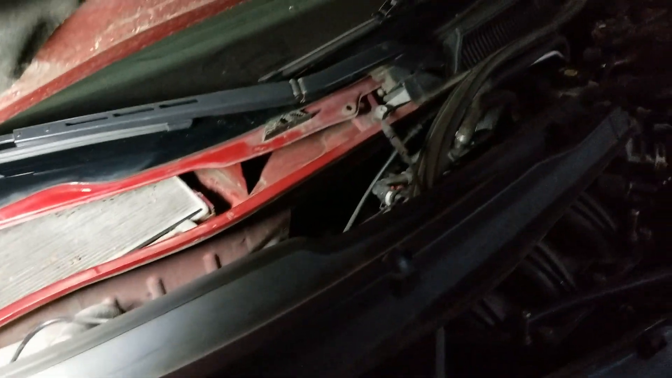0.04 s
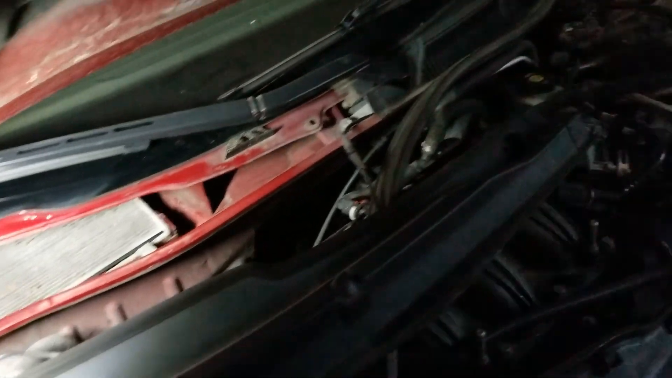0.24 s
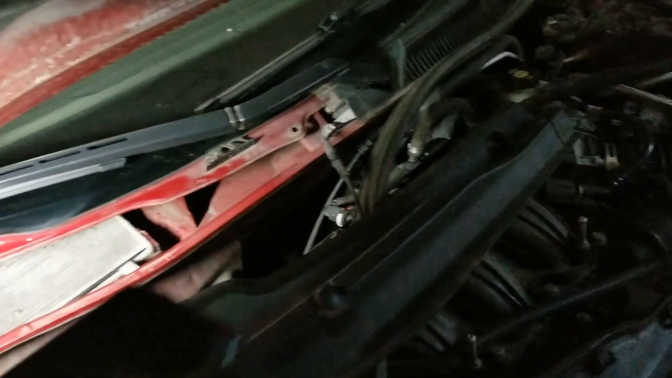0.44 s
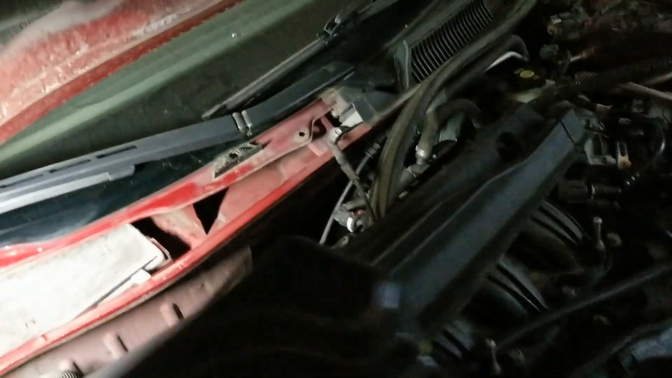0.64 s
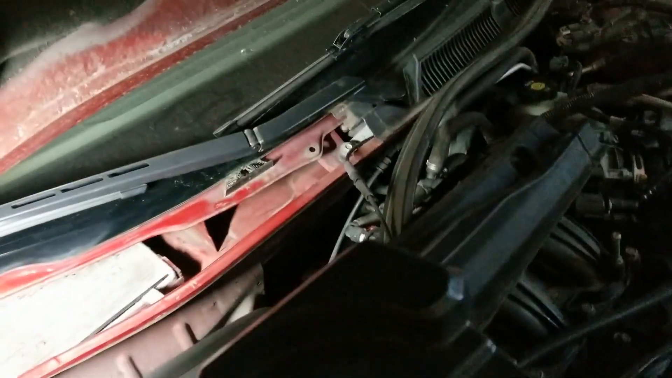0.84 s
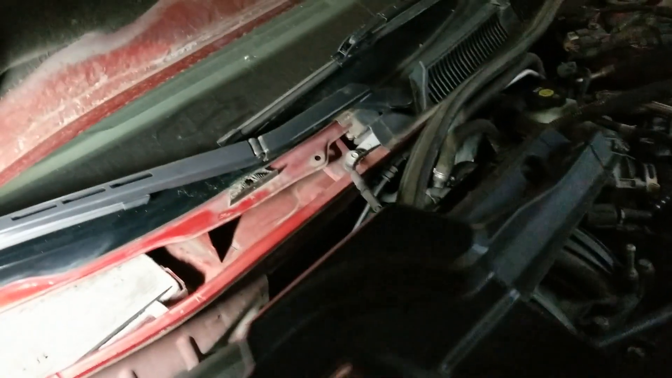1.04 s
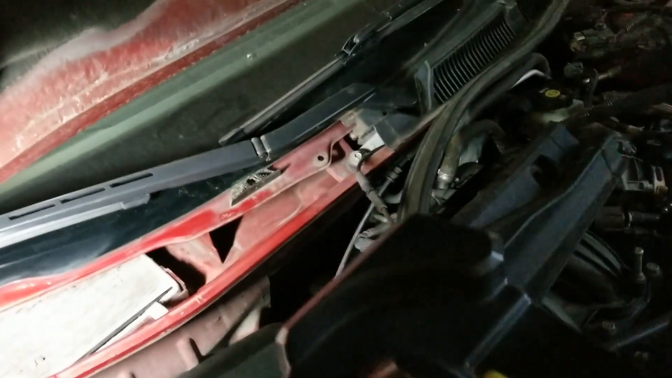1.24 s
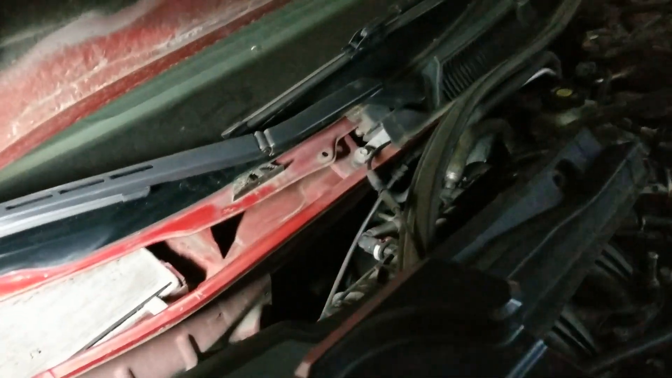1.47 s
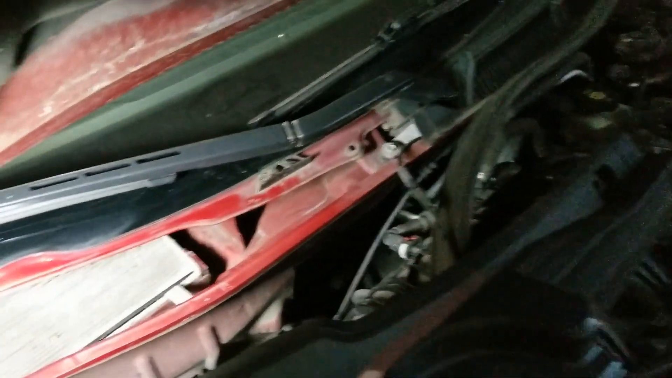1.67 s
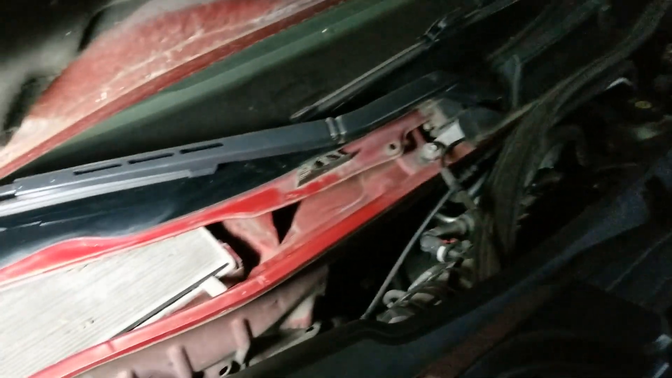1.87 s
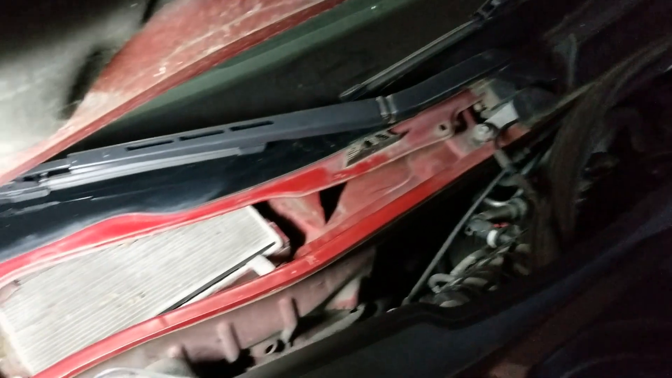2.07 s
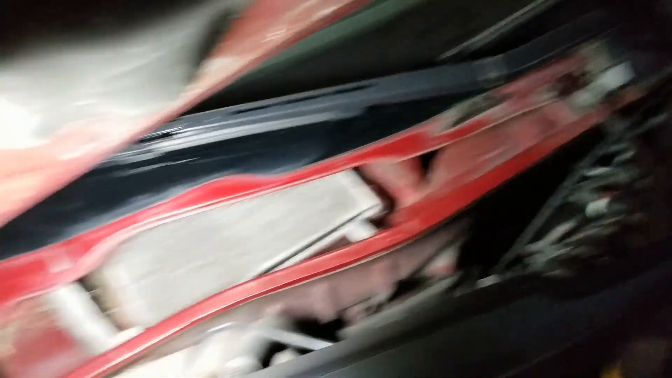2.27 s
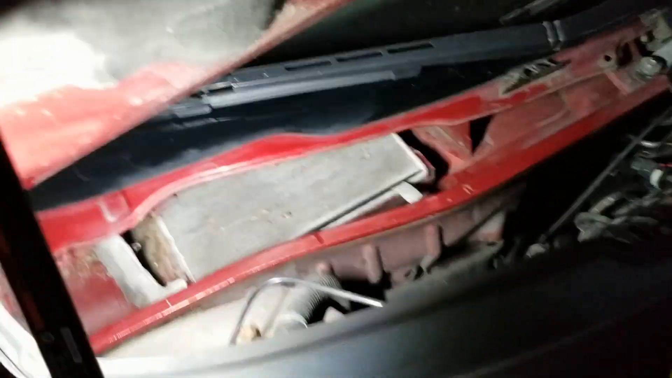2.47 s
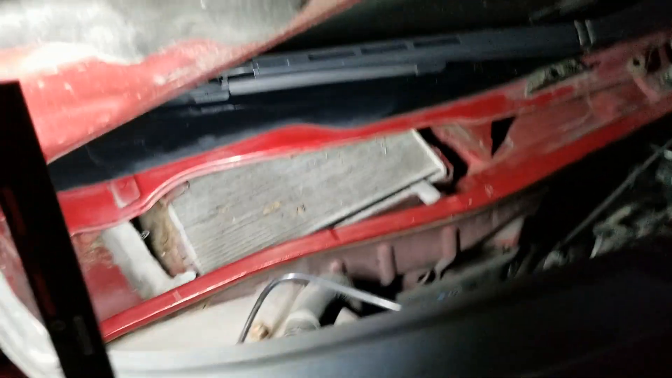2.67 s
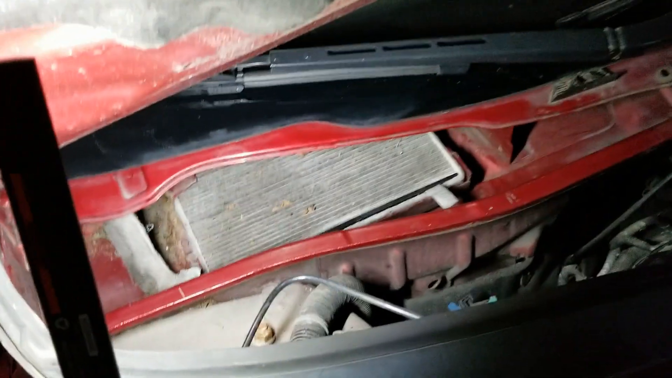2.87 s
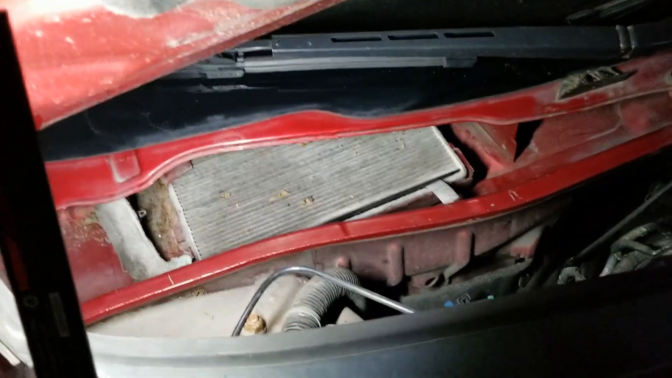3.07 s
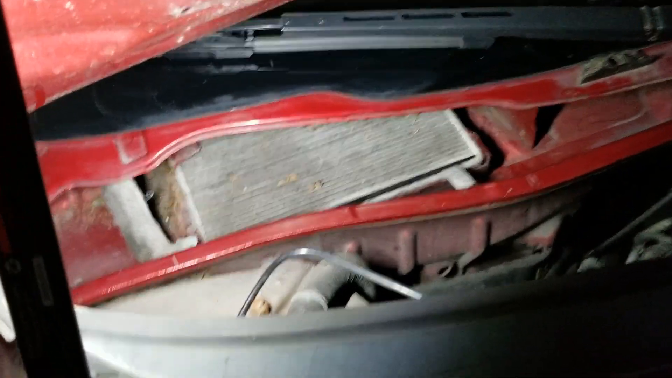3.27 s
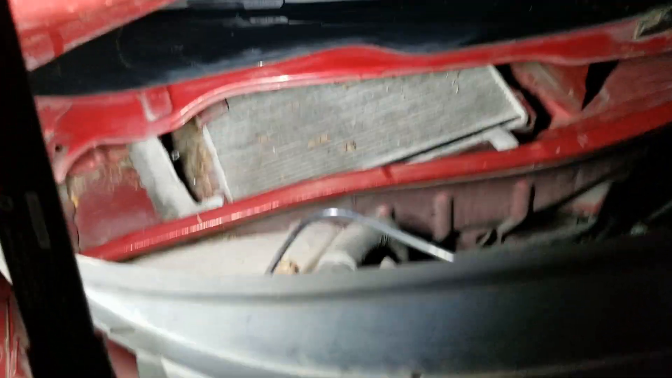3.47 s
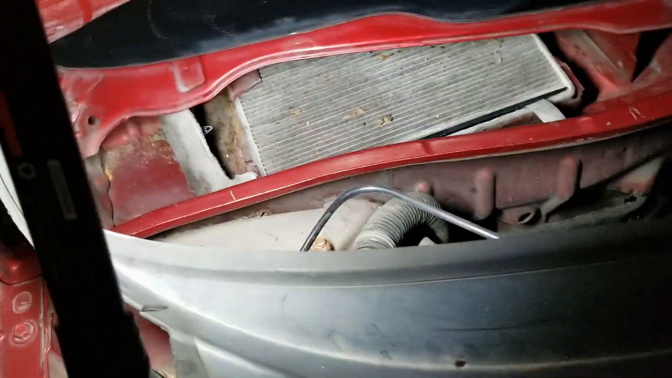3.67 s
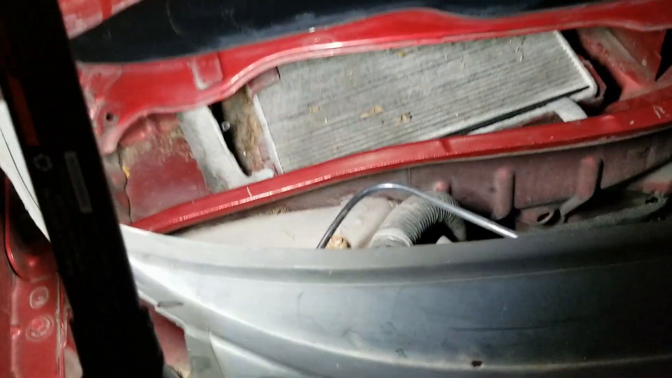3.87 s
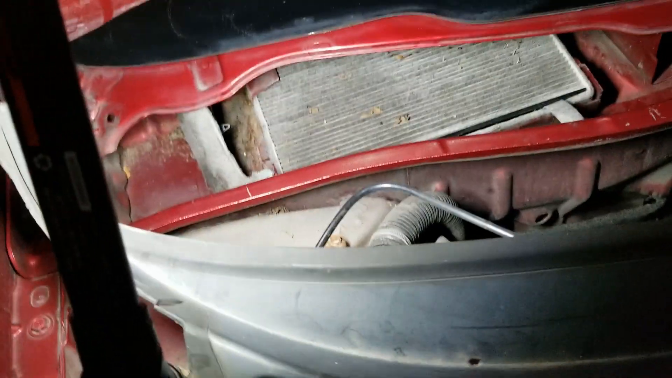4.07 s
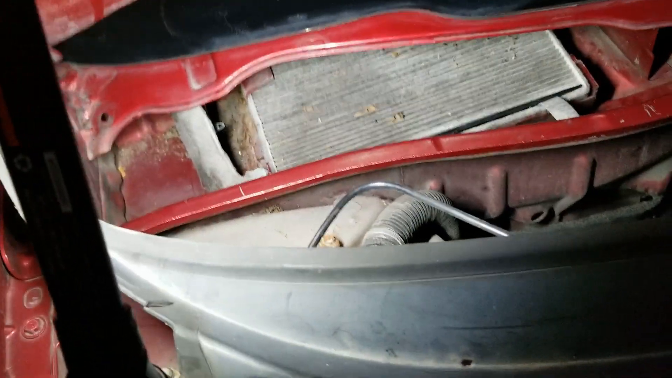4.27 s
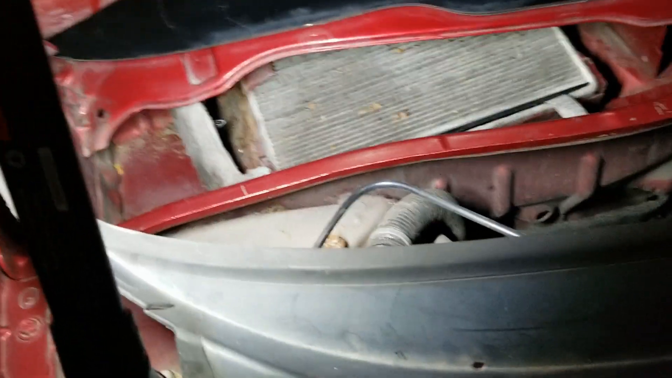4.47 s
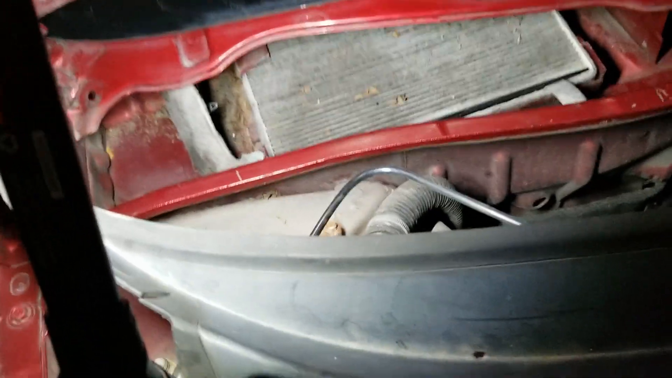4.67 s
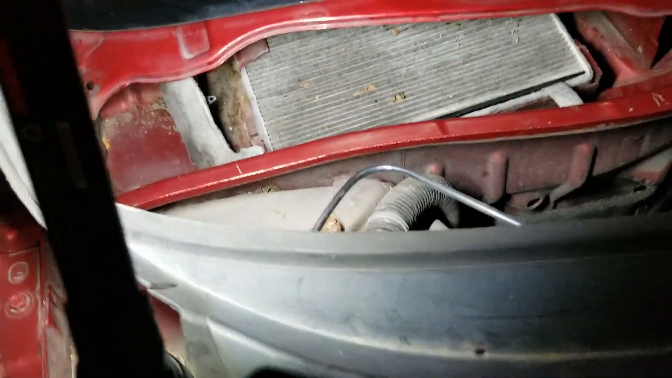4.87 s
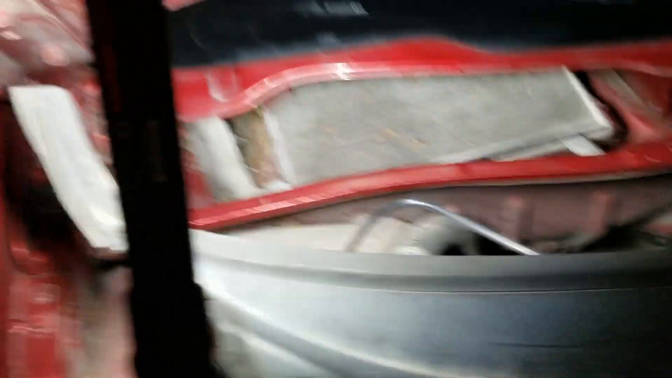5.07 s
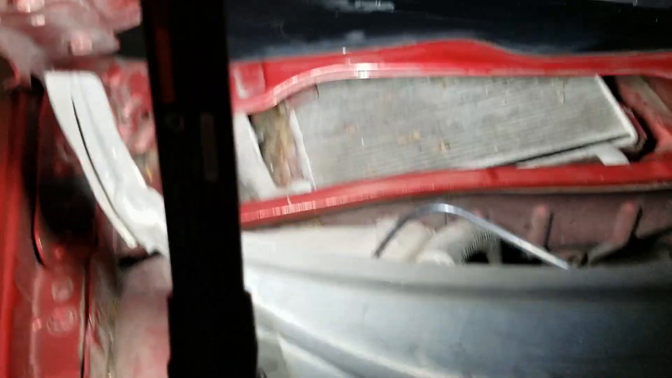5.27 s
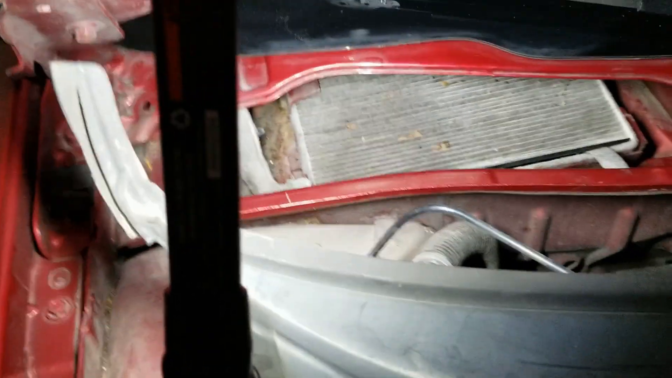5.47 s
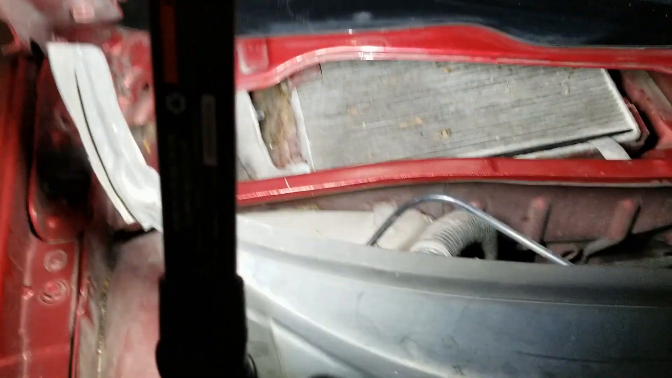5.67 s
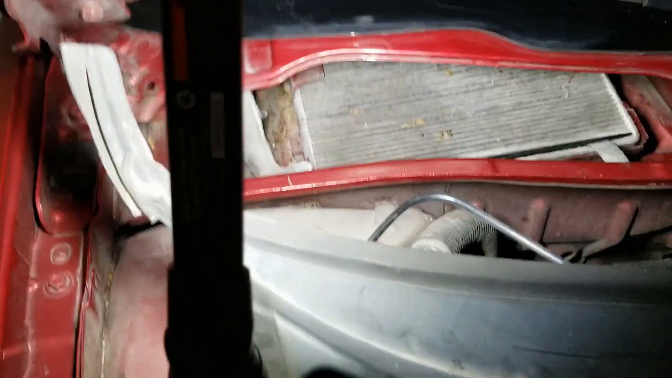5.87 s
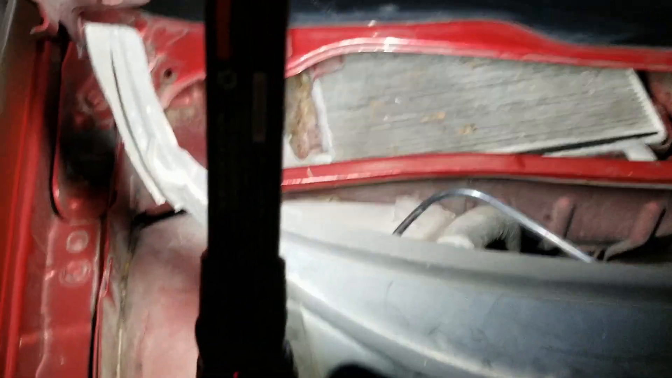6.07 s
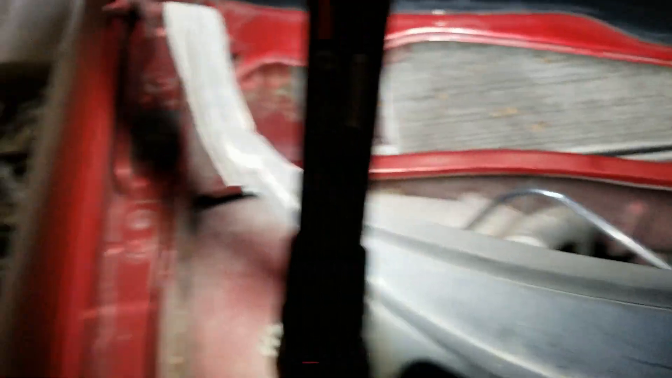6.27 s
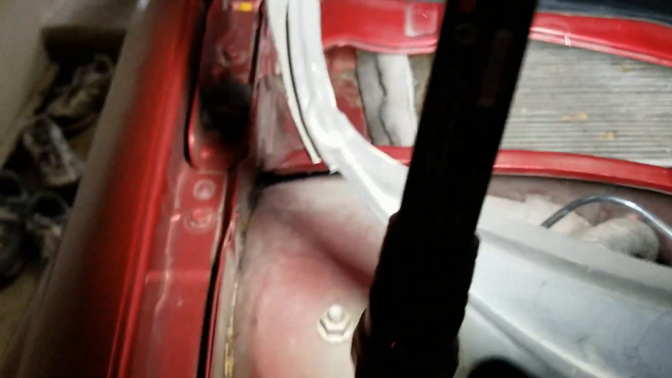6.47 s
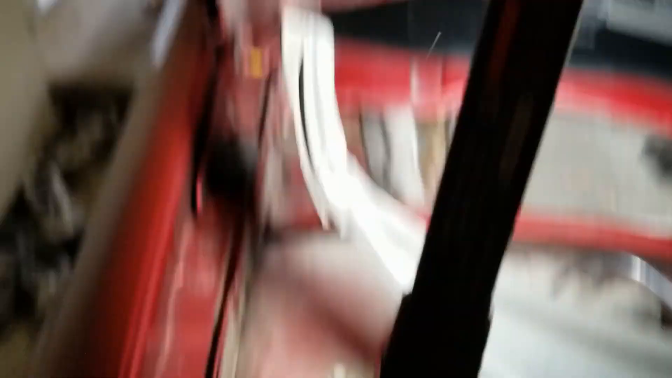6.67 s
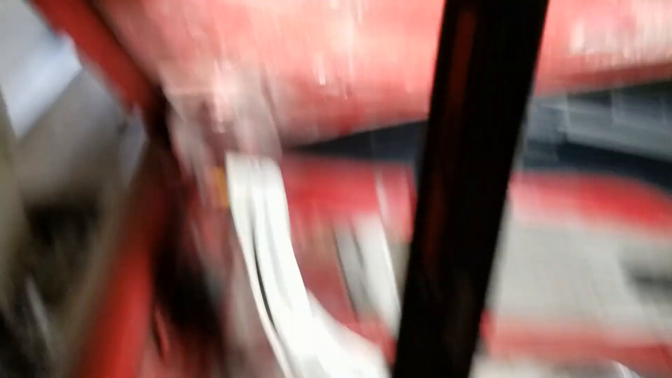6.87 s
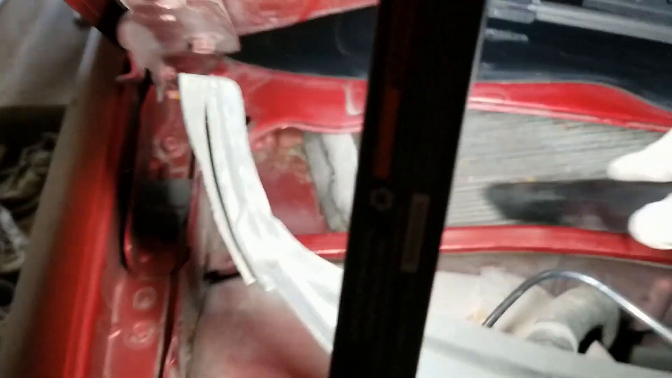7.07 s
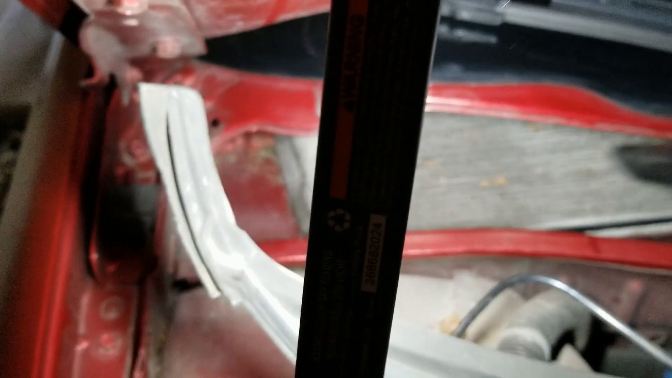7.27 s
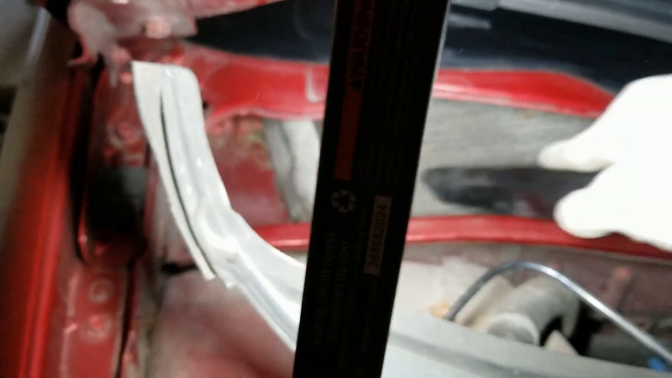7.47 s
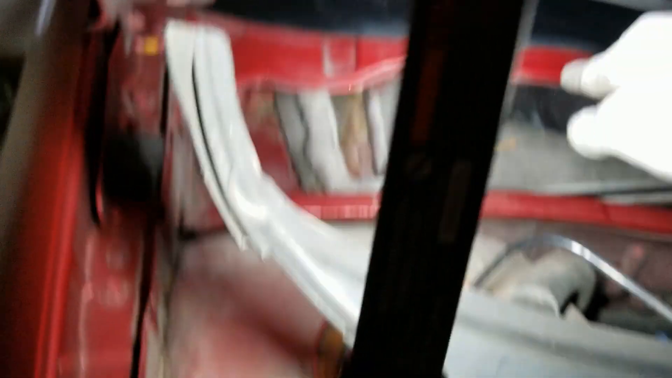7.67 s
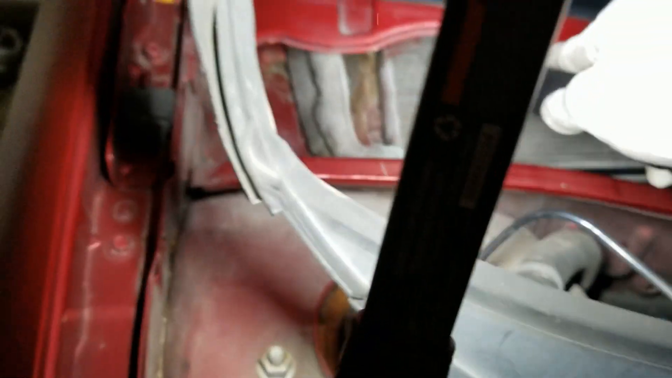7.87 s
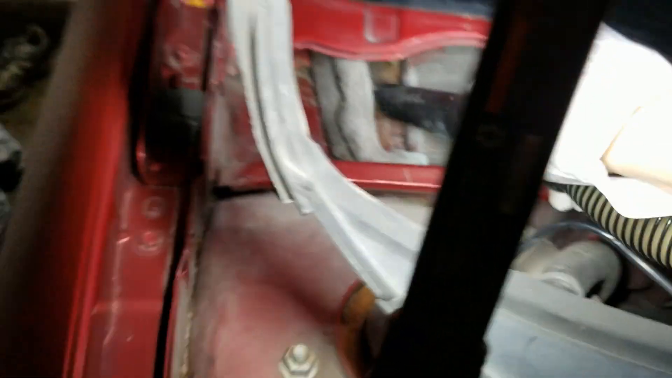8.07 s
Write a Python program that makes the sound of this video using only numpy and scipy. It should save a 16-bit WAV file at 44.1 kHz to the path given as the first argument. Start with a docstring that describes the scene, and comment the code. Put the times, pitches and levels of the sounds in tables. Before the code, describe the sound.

In a quiet garage, hands shift a plastic cover under a car's hood, making light scrapes and hollow clacks, and fingers thump the nearby microphone. Then a sharp click starts a vacuum cleaner, which rises in pitch and settles into a steady rush of air with a high whine that swells and fades between left and right. Its nozzle taps the bodywork several times and the hose slides briefly over an edge.

```python
"""Work in a car's engine bay, heard from a phone close by.
First a plastic cowl panel is rubbed and knocked, and rings in its modes; near 2.5 s fingers bump the phone.
At 4.2 s a switch snaps and a vacuum cleaner spins up, its tones sweeping through fixed resonances.
It settles into shaft hum, a nine-blade whine and rushing air; the whine swells and fades at each ear as
the phone moves through standing waves. The nozzle knocks now and then, and near 6 s the hose slides."""
import sys
import numpy as np
from scipy import signal
from scipy.fft import rfft, irfft
from scipy.io import wavfile

SR = 44100
rng = np.random.default_rng(int(sys.argv[2]) if len(sys.argv) > 2 else 0)


def wav_out(sig):
    """Save sig, one row per channel (or a flat mono array), as 16-bit PCM at SR to the path in sys.argv[1]."""
    wavfile.write(sys.argv[1], SR, np.round(np.clip(np.atleast_2d(sig).T, -1, 1) * 32767).astype(np.int16))


N = 358974
TIME = np.arange(N) / SR
FREQ = np.fft.rfftfreq(N, 1 / SR) + 1e-3
EAR_SIGN = np.array([[1], [-1]])  # left, right
POWER_ON_S, SPIN_UP_S, FULL_SHAFT_HZ = 4.213, .14, 343.5

# blade whine along the phone's path through standing waves: time_s, left_db, right_db
WHINE_LEVELS = [(4.64, -27, -27), (4.69, -39, -19.5), (4.77, -16.5, -44), (4.88, -26, -32), (5.0, -41, -35),
                (5.1, -40, -38), (5.16, -23, -28.5), (5.33, -16.5, -33.5), (5.5, -16, -25),
                (6.05, -18, -25.5), (6.25, -16, -22.5), (6.43, -16, -39), (6.6, -22.5, -34),
                (6.73, -19.5, -32), (6.87, -34, -24.5), (6.97, -20.5, -19), (7.68, -20.5, -27),
                (8.14, -21.5, -21)]
# impeller chamber resonances: centre_hz, width_hz, gain_db
CHAMBER_RESONANCES = [(2100, 130, 12), (2652, 78, 14), (2956, 20, 12)]
# overtones of the whine: shaft_order, level_db, swell_share
BLADE_OVERTONES = [(27, -44, 0.81), (36, -40.5, 0.49), (45, -48, 0.28)]
# common swell of those overtones: time_s, gain_db
OVERTONE_SWELL = [(4.9, -7), (5.15, 6.5), (5.5, 0), (5.87, -1), (6.3, -6), (6.95, -10), (7.22, 3),
                  (7.48, -11), (7.65, 4), (8.14, -4)]
# unbalance hum at the phone: time_s, level_db
HUM_LEVELS = [(4.62, -38), (4.82, -32), (5.3, -29), (6.05, -31.5), (6.5, -27.5), (7.7, -27)]
# motor mount resonance: centre_hz, width_hz, gain_db
MOUNT_RESONANCE = [(269, 74, 17.5)]
# other motor tones at full speed: shaft_order (rounded in use), left_db, right_db
SHAFT_HARMONICS = [(1.998, -38, -48.5), (3.01, -67, -78), (5, -37, -41), (8, -42, -44.5), (10.01, -41, -47),
                   (11, -67.5, -42), (12, -47, -54), (15, -84, -54.5), (16, -47, -59), (17, -46, -107),
                   (18, -45.5, -67), (20, -53, -60), (25.1, -46, -53)]
# tones of the accelerating motor: shaft_order, level_db
STRAIN_TONES = [(5, -29.5), (7, -33.5), (12, -27.5), (14, -35), (18, -36.5), (27, -47.5)]
# housing resonances: centre_hz, width_hz, gain_db
HOUSING_RESONANCES = [(1226, 130, 19.5), (1706, 180, 19.5), (2060, 120, 7), (4850, 120, 23.5),
                      (5200, 200, 18.5), (5600, 400, 5), (6770, 1170, 19), (7750, 480, 17), (8780, 670, 25)]
# rush of air: frequency_hz, density_db
AIR_SPECTRUM = [(25, -87), (65, -73.5), (120, -59), (280, -59), (450, -57), (750, -65), (1300, -67.5),
                (2200, -66.5), (3400, -71), (4400, -75), (7000, -76), (10000, -75.5), (15500, -76)]
# air flow as the nozzle moves: time_s, gain_db
FLOW_GAINS = [(4.5, 0), (4.75, 0.3), (5.35, 0), (5.8, -1), (6.3, 0.5), (6.7, -1.5), (7.2, 0), (8.14, -0.5)]
# duct resonances: centre_hz, width_hz, gain_db
DUCT_RESONANCES = [(115.5, 6.8, 1.5), (600, 9.7, 2.5), (1130, 155, 8), (1450, 150, 8.5), (2500, 1530, 3.5),
                   (2993, 135, 8.5), (4016, 375, 11.5), (4790, 50, 10.5), (5150, 360, 11), (8070, 1760, 5),
                   (12080, 1100, 5.5)]
# balance of the rush: frequency_hz, left_minus_right_db
AIR_BALANCE = [(100, -3), (400, 6.5), (700, -3), (1200, -1.5), (2000, 1.5), (2800, 7), (3500, 1),
               (15000, 0.5)]
# nozzle knocks: start_s, pitch_hz, ring_db, clack_db
NOZZLE_KNOCKS = [(4.709, 424, -26, -17), (4.728, 217, -12, -26), (5.298, 297, -8, -22),
                 (5.369, 335, -7.5, -15.5), (5.775, 182, -11.5, -18), (6.338, 325, -9.5, -21),
                 (7.117, 532, -12.5, -21), (7.685, 854, -20, -15.5)]
# hose sliding over an edge: time_s, rib_rate_hz, level_db
HOSE_PULL = [(5.88, 160, -70), (5.92, 185, -29), (5.96, 235.7, -27.5), (6.01, 303.6, -29), (6.05, 261, -21),
             (6.09, 238, -56), (6.14, 203.4, -24.5), (6.18, 170, -42), (6.22, 142.5, -64)]
# blows on the panel: start_s, thud_db, ring_db, clack_db
PANEL_KNOCKS = [(.005, -46, -20.5, -32.5), (0.037, -42, -33, -47), (.295, -36, -26.5, -43),
                (0.501, -35, -53, -41), (1.208, -35, -45, -60), (1.283, -39, -37, -43),
                (1.328, -24, -29, -42), (1.438, -37, -33, -33.5), (1.464, -29, -23, -22),
                (1.476, -16, -11, -24.5), (1.519, -31, -20, -27.5), (1.582, -16.5, -23, -28),
                (1.664, -21, -32, -43), (1.692, -55, -33, -49), (1.992, -36.5, -43, -41.5),
                (3.111, -40, -30, -36.5), (3.142, -35, -39, -51), (3.235, -57, -44, -30.5),
                (3.248, -41, -29.5, -29), (3.514, -39.5, -35, -58), (3.55, -59, -44, -41.5),
                (3.69, -29.5, -28, -59), (3.789, -51, -22.5, -46), (3.8, -44, -20.5, -19.5),
                (3.817, -48, -40, -51), (4.16, -53, -39.5, -40), (4.21, -50, -25, -21.5),
                (4.225, -50, -27, -38)]
# modes of the panel and the bay behind it: pitch_hz, t60_s, level_db
PANEL_MODES = [(157.5, 0.21, -2), (187.7, 0.13, 4), (205.2, 0.29, 3.5), (235.6, 0.14, 3), (285, 0.25, -1.5),
               (320.6, 0.084, 5), (376, 0.15, -17), (474, 0.2, -11.5), (531.3, 0.093, -7), (764, 0.11, -16),
               (860, 0.21, -17), (1640, 0.21, -29), (1825, 0.2, -23)]
# clack of hard plastic: frequency_hz, level_db
CLACK_SPECTRUM = [(100, -12), (400, 13), (900, -1), (1400, 7.5), (2300, 1), (3300, -2.5), (4800, -14),
                  (7000, -14), (12000, -23.5), (16000, -22)]
# small modes rung by a clack: pitch_hz, t60_s, level_db
CLACK_MODES = [(634, 0.18, -23), (808, 0.15, -15.5), (912, 0.11, -12), (1047, 0.057, -5),
               (1194, 0.084, -10), (1475, 0.12, -16), (1840, 0.099, -24), (2225, 0.097, -15),
               (2370, 0.083, -13), (2770, 0.065, -12.5)]
# cavity resonances of the plastic parts: centre_hz, width_hz, gain_db
CAVITY_RESONANCES = [(555, 300, 0), (897, 220, 2.5), (1185, 170, 3.5), (1910, 110, 1.5), (2140, 290, 2.5),
                     (2630, 600, 2), (3200, 210, 2.5), (4500, 640, 7)]
# snaps, the loudest from the power switch: start_s, level_db
SNAP_EVENTS = [(1.113, -39.5), (1.586, -28.5), (1.756, -45), (2.177, -50), (2.387, -45.5), (3.248, -30.5),
               (3.92, -40.5), (4.2, -10), (4.208, -22)]
# ring of a snap: frequency_hz, level_db
SNAP_SPECTRUM = [(200, -28), (1200, 0), (1700, -1), (2140, 10), (2900, -1), (4000, 6), (5200, -14),
                 (6100, -8.5), (9500, -17.5), (12200, -2.5), (16000, -14)]
# fingers on the phone's case: start_s, thump_db, tick_db, left_minus_right_db
CASE_BUMPS = [(2.4913, -37, -20.5, 13), (2.4978, -13, -4.5, 12.5), (2.502, -16, -18, 22),
              (2.5101, -43, -9.5, 19), (2.588, -21, -11.5, 9), (2.709, -40, -9.5, -17),
              (2.712, -2.5, -19, -13), (2.7389, -22, -14.5, -17), (2.7447, -26, -21.5, -19)]
# plastic and sleeve rubbing: start_s, length_s, rumble_db, scrape_db, hiss_db
RUB_STROKES = [(-.03, 0.084, -36, -46.5, -47), (0.067, 0.22, -71, -55, -54), (0.239, 0.3, -52.5, -51, -45),
               (.58, .42, -73, -63.5, -64), (0.97, 0.35, -55, -57.5, -58.5),
               (1.265, 0.25, -42.5, -58.5, -79), (1.43, 0.12, -31.5, -47, -56),
               (1.66, 0.18, -53.5, -61.5, -64), (1.85, 0.24, -69, -64.5, -60),
               (2.327, 0.15, -61, -64.5, -54.5), (2.484, 0.15, -41, -39, -45.5),
               (2.651, 0.084, -40.5, -43.5, -44), (2.818, 0.35, -63, -64, -61.5),
               (3.092, 0.14, -48, -59, -51.5), (3.3, .24, -55.5, -60.5, -64), (3.567, .16, -45.5, -54, -57),
               (3.71, 0.12, -42.5, -49, -48.5), (3.857, 0.11, -51, -57.5, -59),
               (3.99, 0.037, -44, -55, -53), (4.169, 0.17, -34, -43.5, -52)]
# squeals of dragged plastic: start_s, length_s, first_hz, last_hz, level_db
SQUEAL_GLIDES = [(0.849, 0.71, 2850, 2920, -63.5), (2.53, 0.051, 2050, 2800, -47),
                 (2.673, .06, 4720, 4440, -49)]
# hiss of cloth: frequency_hz, level_db
CLOTH_SPECTRUM = [(1000, -5), (4000, -1), (6500, -2), (10000, 1.5), (13000, 4), (16000, 4)]
# quiet garage and microphone hiss: frequency_hz, density_db
GARAGE_SPECTRUM = [(25, -73), (55, -73), (115, -79), (250, -86), (500, -115), (1000, -110.5), (3000, -100),
                   (6000, -108), (10000, -107), (13000, -103), (16000, -103)]
# likeness of noise at the two ears: frequency_hz, correlation
EAR_CORRELATION = [(50, .8), (150, .95), (350, .88), (700, .35), (1500, .15), (4500, .15), (8000, .62),
                   (15000, .62)]


def motor(speed, echo_db=-3):
    """Rotating machinery radiates tones at multiples, or orders, of its shaft rate."""
    shaft_hz = FULL_SHAFT_HZ * speed
    gliding = np.clip((340 - shaft_hz) / 30, 0, 1)
    jitter = .00035 + .004 * gliding  # the shaft runs roughly until it is up to speed
    angle = 2 * np.pi * np.cumsum(shaft_hz * (1 + jitter * walk(53) + .0002 * walk(2))) / SR
    hum = unbalance_hum(angle, speed)
    tones = blade_whine(angle, speed) + bearing_tone(angle, speed)
    wavers = np.array([walk(23) for _ in range(8)])
    tones += shaft_harmonics(angle, speed, wavers) + blade_overtones(angle, speed, wavers)
    tones += strain(angle, speed)
    return np.sqrt(2) * (hum + wall_echoes(tones, undb(echo_db) * gliding))


def blade_whine(angle, speed, blades=9, db_per_decade=96, waver_db=.7, lag_rad=.84):
    """Each passing blade sends out a pressure pulse, giving a tone at the blade-passing frequency."""
    level_db = np.array(curves(WHINE_LEVELS)) + db_per_decade * np.log10(speed)
    level_db += resonance_db(blades * FULL_SHAFT_HZ * speed, CHAMBER_RESONANCES) + waver_db * walk(22)
    return undb(level_db) * np.sin(blades * angle + EAR_SIGN * (lag_rad + .57 * walk(.49)))


def blade_overtones(angle, speed, wavers, db_per_decade=105, shimmer_db=2.6, blur_rad=.5):
    """Periodic blade pulses carry harmonics, whose phase is modulated by turbulence."""
    out, swell_db = np.zeros((2, N)), curves(OVERTONE_SWELL)[0]
    for (order, db, share), shimmer in zip(BLADE_OVERTONES, wavers):
        level_db = db + share * swell_db + db_per_decade * np.log10(speed) + shimmer_db * shimmer
        out += undb(level_db) * np.sin(order * angle + .07 * EAR_SIGN + blur_rad * walk(45))
    return out * ears(1.5)


def unbalance_hum(angle, speed, db_per_decade=17):
    """Rotating unbalance forces the mount once a turn and passes through its resonance."""
    level_db = curves(HUM_LEVELS)[0] + db_per_decade * np.log10(speed)
    level_db += resonance_db(FULL_SHAFT_HZ * speed, MOUNT_RESONANCE) + walk(12)
    return undb(level_db) * np.sin(angle + .088 * EAR_SIGN) * ears(.92)


def shaft_harmonics(angle, speed, wavers, db_per_decade=77, flicker_db=1, drift_rad=.72):
    """Harmonics lock to the shaft; at a moving receiver each wavers in level and phase."""
    out = np.zeros((2, N))
    for order, *ear_db in SHAFT_HARMONICS:
        for ear, db in enumerate(ear_db):
            swell, bend = np.roll(wavers[rng.permutation(8)[:2]], rng.integers(N // 2), axis=1)
            out[ear] += undb(db + flicker_db * swell) * np.sin(round(order) * angle + drift_rad * bend)
    return out * undb(db_per_decade * np.log10(speed))


def bearing_tone(angle, speed, order=2.632, db_per_decade=77):
    """Rolling contact in a bearing sounds at a non-integer order of the shaft rate."""
    level_db = -48 + db_per_decade * np.log10(speed)
    return undb(level_db) * np.sin(order * angle + .85 * walk(1.4)) * ears(12.3)


def strain(angle, speed, rough_db=3, blur_rad=.8):
    """Forced vibration: tones of the accelerating motor flare as they cross the housing's resonances."""
    out = np.zeros((2, N))
    for order, db in STRAIN_TONES:
        flare_db = resonance_db(order * FULL_SHAFT_HZ * speed, HOUSING_RESONANCES)
        gain = undb(db + flare_db + rough_db * walk(40))
        out += gain * np.sin(order * angle + .92 * EAR_SIGN + blur_rad * walk(116))
    return out * speed ** 1.46 * (1 - speed) ** .64  # the current dies away as the speed builds


def air_rush(speed, db_per_decade=39, churn_fall_db_per_s=3.5, flutter_db=3.34):
    """Turbulence makes broadband noise, coloured by duct resonances; its middle band churns at first."""
    flow_db = curves(FLOW_GAINS)[0] + db_per_decade * np.log10(speed)
    churn_db = 2 - churn_fall_db_per_s * (TIME - POWER_ON_S) + flutter_db * walk(4.3)
    churn = undb(churn_db) * np.minimum(speed / .44, 1) ** 2
    colour_db = shape(AIR_SPECTRUM) + resonance_db(FREQ, DUCT_RESONANCES)
    spectrum = rfft(noise(colour_db + shape(AIR_BALANCE) * EAR_SIGN / 2))
    middle = irfft(spectrum * undb(band(1200, 1400)), N)
    rush = irfft(spectrum, N) - middle
    for hz, width, _ in DUCT_RESONANCES[6:9]:  # these come and go as the hose bends
        duct = irfft(spectrum * np.exp(-((FREQ - hz) / width) ** 2), N)
        rush += duct * (undb(2.2 * walk(2)) - 1)
    return (rush * undb(flow_db) + middle * churn) * undb(.64 * walk(46))


def nozzle_knocks(grit, ring_t60=.063, rise_s=.0085):
    """Impact on the bodywork gives a clack and excites damped, inharmonic modes of the tube."""
    out, age = np.zeros((2, N)), TIME[:SR // 4]
    envelope = (1 - np.exp(-age / rise_s)) * fade(ring_t60, age)
    modes = [(.8, .85), (1, 1.84), (1.4, .78)]
    for s, hz, ring_db, clack_db in NOZZLE_KNOCKS:
        ring = sum(gain * np.sin(2 * np.pi * hz * ratio * age) for ratio, gain in modes)
        add(out, s, undb(ring_db) * envelope * ring + undb(clack_db) * clack(grit, age))
    return out * ears(1.5)


def hose_zip():
    """Periodic excitation: ribs flick an edge, so the pitch follows the speed of the pull."""
    rib_hz, db = curves(HOSE_PULL)
    phase = 2 * np.pi * np.cumsum(rib_hz * (1 + .058 * walk(93))) / SR
    ribs = np.sin(phase) + .12 * np.sin(2 * phase) + .064 * np.sin(3 * phase)
    return unit(ribs) * undb(db + 2 * walk(50)) * (db > min(db))


def panel_knocks(grit, thud_hz=116, low_thud_hz=66, thud_t60=.21, push_s=.0017):
    """Modal superposition: each blow clacks, rings the panel's modes and shakes the body beneath."""
    out, age = np.zeros((2, N)), TIME[:SR // 2]
    hz, t60, db = np.transpose(PANEL_MODES)[:, :, None]
    push = 1 - np.exp(-age / push_s)
    thud = np.sin(2 * np.pi * thud_hz * age) + .43 * np.sin(2 * np.pi * low_thud_hz * age)
    thud *= fade(thud_t60, age)
    for s, thud_db, ring_db, clack_db in PANEL_KNOCKS:
        size, detune, lag = rng.standard_normal((3, len(PANEL_MODES), 1))
        gains = undb(db + 2 * size)  # the point of contact favours other modes each time
        phases = 2 * np.pi * hz * (1 + .016 * detune) * age + 1.52 * lag
        ring = np.sum(gains * fade(t60, age) * np.sin(phases), axis=0) * np.sqrt(2 / np.sum(gains ** 2))
        body = push * (undb(thud_db) * thud + undb(ring_db) * ring)
        add(out, s, body + undb(clack_db) * clack(grit, age))
    return out * ears(1.8)


def clack(grit, age, rise_s=.0013, contact_t60=.047, tail_t60=.2, tail_db=-18):
    """Contact chatter sets hard plastic into brief free vibration, and the bay reverberates."""
    chatter = piece(grit, len(age)) * (fade(contact_t60, age) + undb(tail_db) * fade(tail_t60, age))
    count = len(CLACK_MODES)
    phases = rng.uniform(0, 2 * np.pi, (count, 1, 1)) + 1.45 * rng.standard_normal((count, 2, 1))
    ring = sum(undb(db) * fade(t60, age) * np.sin(2 * np.pi * hz * age + phase)
               for (hz, t60, db), phase in zip(CLACK_MODES, phases))
    return (chatter + ring) * (1 - np.exp(-age / rise_s))


def snaps(crack_t60=.025, tail_t60=.21, tail_db=-20):
    """Snap-through: small stiff plastic parts release elastic energy in a bright crack."""
    out, age = np.zeros((2, N)), TIME[:SR // 4]
    ring = unit(noise(shape(SNAP_SPECTRUM)))
    envelope = fade(crack_t60, age) + undb(tail_db) * fade(tail_t60, age)
    for s, db in SNAP_EVENTS:
        add(out, s, undb(db) * piece(ring, len(age)) * envelope)
    return out * ears(-.89)


def case_bumps(thump_hz=62, thump_t60=.026, tick_s=.00016, tick_rise_s=.00004):
    """Structure-borne sound: a touch reaches the nearer microphone as a tick and a damped thump."""
    out, age = np.zeros((2, N)), TIME[:SR // 4]
    thump = np.sin(2 * np.pi * thump_hz * age) * fade(thump_t60, age)
    tick = np.exp(-age / tick_rise_s) - np.exp(-age / tick_s)
    for s, thump_db, tick_db, pan_db in CASE_BUMPS:
        add(out, s, ears(pan_db) * (undb(thump_db) * thump + undb(tick_db) * tick))
    return out


def rubbing(grain_db=2, grip_s=.043, release_t60=.32, rustle_db=(-61, -76, -71)):
    """Sliding friction: the panel rumbles, plastic scrapes and squeals, cloth hisses."""
    power = undb(rustle_db)[:, None] ** 2 * np.ones(N)  # the hands rustle on between strokes
    for s, length, *db in RUB_STROKES:
        stroke = np.clip((TIME - s) / grip_s, 0, 1) * fade(release_t60, np.maximum(TIME - s - length, 0))
        power += (undb(db)[:, None] * stroke) ** 2
    rumble_gain, scrape_gain, hiss_gain = np.sqrt(power)
    grip_db = grain_db * walk(50)
    rumble = unit(noise(band(50, 283))) * rumble_gain
    scrape = unit(noise(2 * band(220, 3400) + resonance_db(FREQ, CAVITY_RESONANCES))) * scrape_gain
    squeal = squeals()
    hiss = unit(noise(shape(CLOTH_SPECTRUM))) * hiss_gain
    return rumble + scrape * undb(grip_db) + squeal + hiss * undb(grip_db / 2)


def squeals(width_hz=85):
    """Stick-slip at an unsteady rate gives a narrow, gliding band of noise."""
    slips = np.zeros((1, N))
    for s, length, first_hz, last_hz, db in SQUEAL_GLIDES:
        hz = np.linspace(first_hz, last_hz, int(length * SR))
        glide = np.sqrt(2) * np.sin(2 * np.pi * np.cumsum(hz) / SR)
        add(slips, s, undb(db) * signal.windows.tukey(len(hz)) * glide)
    return slips * unit(noise(band(5.7, width_hz)))


def wall_echoes(x, share, t60=.19):
    """Reverberation adds the lower pitch of a moment ago to the direct sound, blurring a glide."""
    age = TIME[:SR // 2]
    tail = rng.standard_normal((2, len(age))) * fade(t60, age - .004)
    tail /= np.sqrt(np.sum(tail ** 2, axis=1, keepdims=True))
    return x + signal.fftconvolve(x * share, tail, axes=1)[:, :N]


def garage():
    """The noise floor: low room rumble and microphone hiss, wavering slightly in level."""
    return noise(shape(GARAGE_SPECTRUM)) * undb(walk(6.9))


def undb(db):
    """Decibels to amplitude ratio."""
    return 10 ** (np.asarray(db) / 20)


def unit(x):
    """Normalisation to rms 1."""
    return x / np.sqrt(np.mean(x ** 2))


def curves(table):
    """Linear interpolation of a timed table's columns at every sample."""
    s, *columns = np.transpose(table)
    return [np.interp(TIME, s, column) for column in columns]


def shape(points):
    """Interpolation of a spectrum over log frequency."""
    hz, value = np.transpose(points)
    return np.interp(np.log(FREQ), np.log(hz), value)


def resonance_db(hz, resonances):
    """Gain of a set of bell-shaped resonance peaks."""
    return sum(db / (1 + (2 * (hz - centre) / width) ** 2) for centre, width, db in resonances)


def band(lo_hz, hi_hz):
    """Band-pass response in dB, with second-order slopes."""
    return -10 * np.log10((1 + (lo_hz / FREQ) ** 4) * (1 + (FREQ / hi_hz) ** 4))


def ears(pan_db):
    """Left and right gains for an interaural level difference."""
    return undb(EAR_SIGN * pan_db / 2)


def noise(db):
    """Partly coherent stereo noise of a given spectral density; the bass is alike in both ears."""
    mid, side = rfft(rng.standard_normal((2, N)))
    alike = shape(EAR_CORRELATION)
    mid, side = mid * np.sqrt(1 + alike), side * np.sqrt(1 - alike)
    return irfft(np.array([mid + side, mid - side]) * undb(db), N) * np.sqrt(SR) / 2


def walk(rate_hz):
    """Low-pass random fluctuation with rms 1."""
    steps = rng.standard_normal(N // 32)
    hz = np.fft.rfftfreq(len(steps), 32 / SR)
    slow = unit(irfft(rfft(steps) / (1 + (hz / rate_hz) ** 2) ** 2, len(steps)))
    return np.interp(TIME, np.linspace(0, TIME[-1], len(steps)), slow)


def fade(t60, age):
    """Exponential decay by 60 dB in t60 seconds, silent before age 0."""
    return (age >= 0) * undb(-60 * np.clip(age / t60, 0, 3))


def add(out, start_s, sound):
    """Superposition of a short sound on the mix."""
    start = max(int(start_s * SR), 0)
    out[:, start:start + sound.shape[-1]] += sound[..., :N - start]


def piece(x, size):
    """A random stretch of a stereo noise."""
    start = rng.integers(N - size)
    return x[:, start:start + size]


def scene():
    """Cleaner, handling and garage superpose; the shaft nears full speed as a first-order lag."""
    speed = np.maximum(1 - np.exp(-(TIME - POWER_ON_S) / SPIN_UP_S), 1e-3)  # share of full speed
    cleaner = (TIME > POWER_ON_S) * (motor(speed) + air_rush(speed))
    grit = unit(noise(shape(CLACK_SPECTRUM) + resonance_db(FREQ, CAVITY_RESONANCES)))
    handling = hose_zip() + panel_knocks(grit) + nozzle_knocks(grit) + snaps() + case_bumps() + rubbing()
    return cleaner + handling + garage()


def record(dry, low_hz=38, top_hz=15800):
    """Band limiting and saturation: the phone drops deep bass, clips at full scale and cuts the top."""
    high_pass = signal.butter(2, low_hz, "high", fs=SR, output="sos")
    low_pass = signal.ellip(12, .1, 80, top_hz, fs=SR, output="sos")
    return signal.sosfilt(low_pass, np.clip(signal.sosfilt(high_pass, dry), -1, 1))


dry = scene()
out = record(dry)
wav_out(out)
```